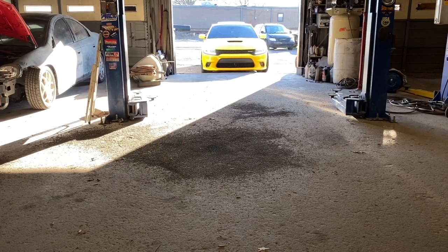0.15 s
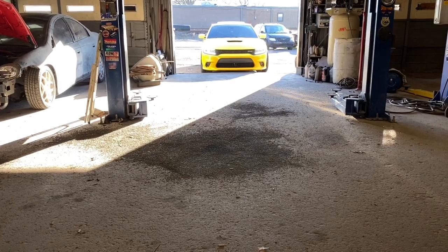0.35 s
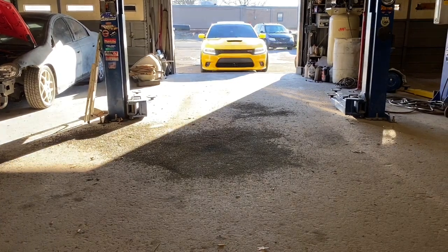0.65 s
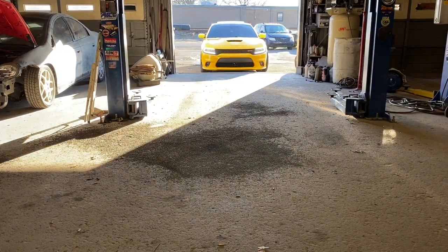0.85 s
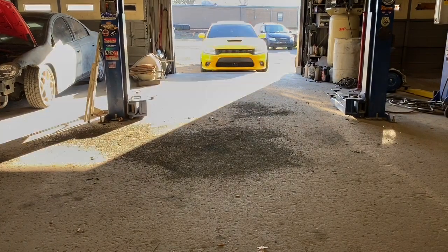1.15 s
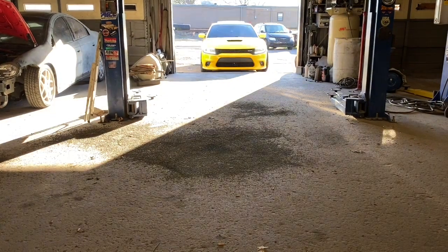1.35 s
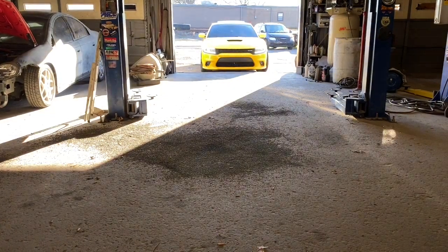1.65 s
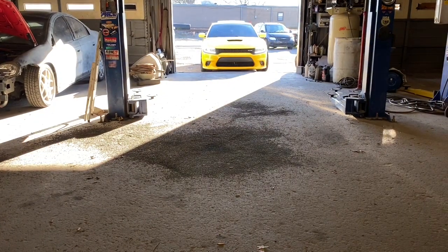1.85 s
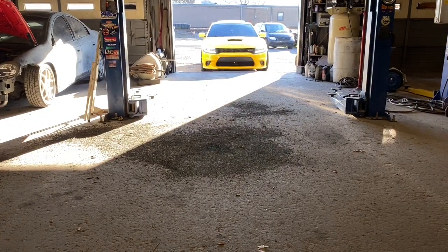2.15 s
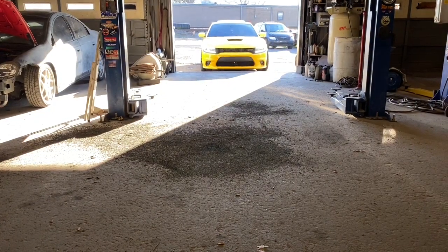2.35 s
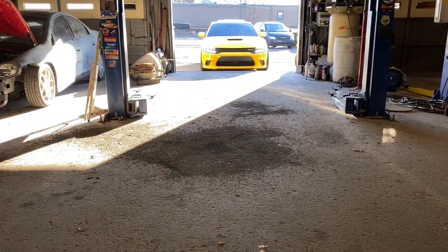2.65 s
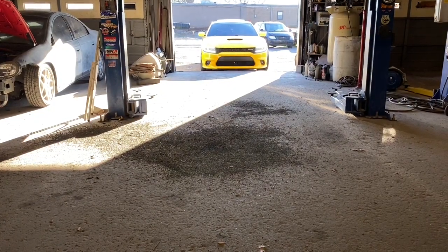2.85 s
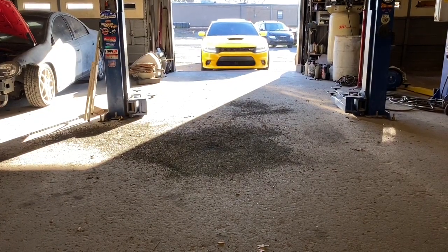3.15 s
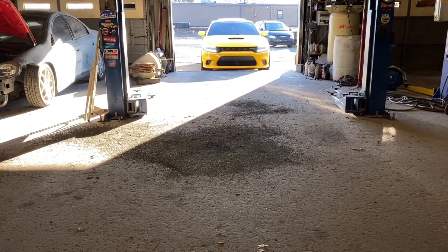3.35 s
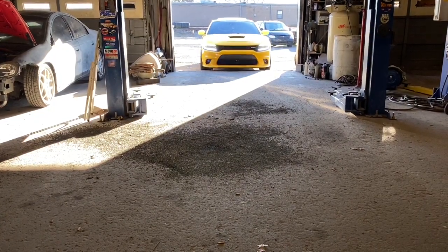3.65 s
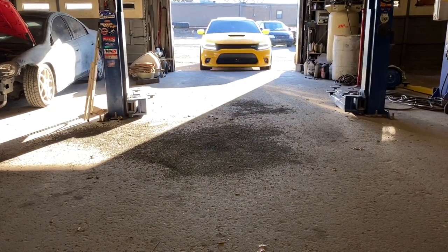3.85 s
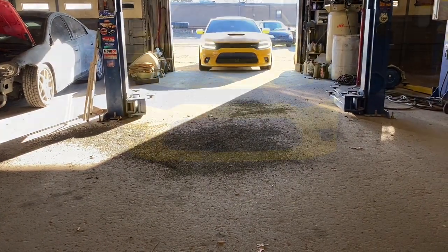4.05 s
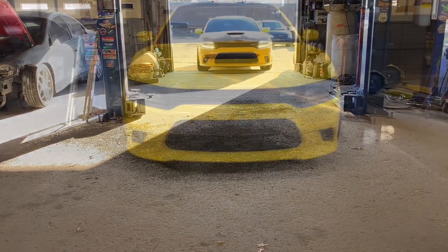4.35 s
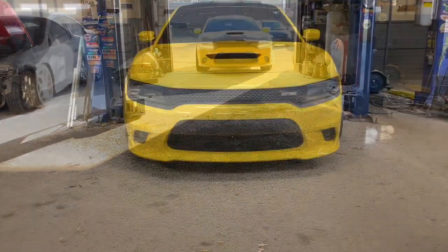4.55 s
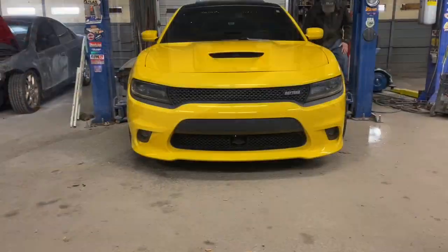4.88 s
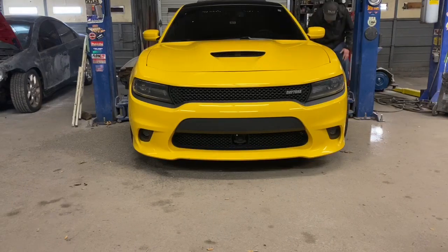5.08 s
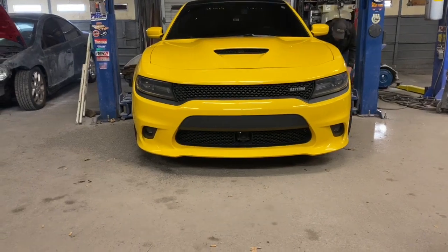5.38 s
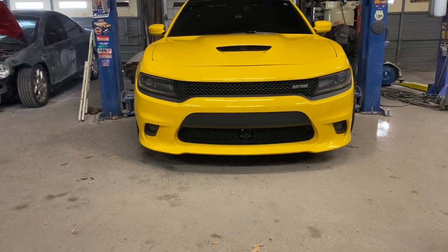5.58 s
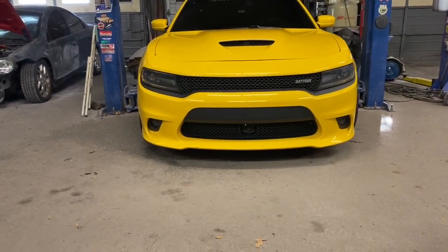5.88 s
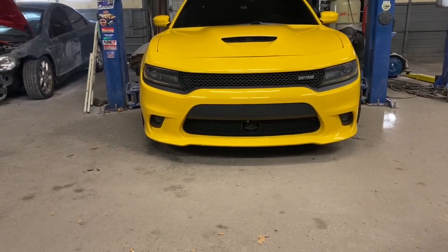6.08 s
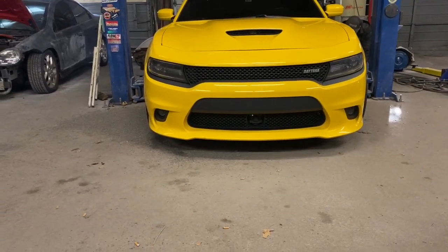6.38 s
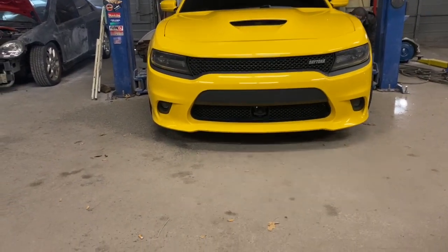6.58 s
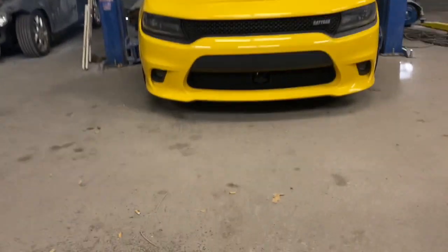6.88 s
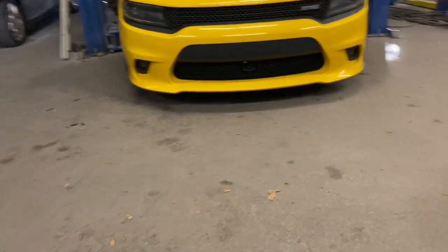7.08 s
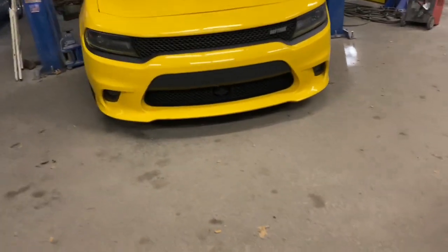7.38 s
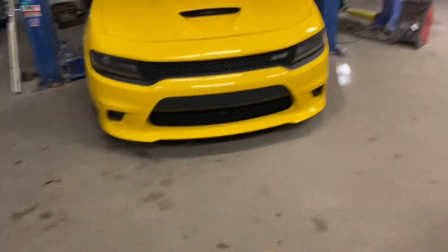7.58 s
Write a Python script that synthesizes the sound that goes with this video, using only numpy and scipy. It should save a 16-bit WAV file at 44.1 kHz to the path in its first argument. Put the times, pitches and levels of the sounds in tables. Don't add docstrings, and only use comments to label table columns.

```python
import sys
import numpy as np
from scipy import signal
from scipy.fft import rfft, irfft
from scipy.io import wavfile
from scipy.ndimage import uniform_filter1d

SR = 44100
rng = np.random.default_rng(int(sys.argv[2]) if len(sys.argv) > 2 else 0)


def file_out(sig):
    cols = np.atleast_2d(sig).T
    lim = np.clip(cols, -1, 1)
    pcm = np.round(lim * 32767).astype(np.int16)
    wavfile.write(sys.argv[1], SR, pcm)


def boost_factor(decibels):
    exponent = np.asarray(decibels, float) / 20
    return 10 ** exponent


N = 340893
T = np.arange(N) / SR
HZ = np.fft.rfftfreq(N, 1 / SR)

POPS_PER_S, POP_SPREAD_DB = 300, 1.5
INSIDE_S = 4.7
# freq_hz, right_lag_samples
PORT_LAG = [(300, 16), (1000, 15.8), (2000, 18), (3000, 19), (6000, 21.5)]


def evened(x):
    return x / np.sqrt(np.mean(x ** 2) + 1e-20)


def read(points, hz):
    f, value = np.transpose(points)
    return np.interp(np.log(hz + 1), np.log(f + 1), value)


def curves(tables):
    s, *columns = np.vstack(tables).T
    return [np.interp(T, s, column) for column in columns]


def after(s, span_s):
    return np.clip((T - s) / span_s + 0.5, 0, 1)


def colour(x, gain):
    return irfft(rfft(x) * gain, N)


def band(x, lo_hz, hi_hz):
    low_side = 1 + (lo_hz / (HZ + 1)) ** 16
    high_side = 1 + (HZ / hi_hz) ** 16
    return colour(x, 1 / np.sqrt(low_side * high_side))


def modes(table, sign):
    response = 0
    for k, (hz, width_hz, level_db) in enumerate(table):
        response = response + sign ** k * boost_factor(level_db) / (1 + 2j * (HZ - hz) / width_hz) ** 2
    return response


def wander(rate_hz):
    return evened(colour(rng.standard_normal(N), 1 / (1 + (HZ / rate_hz) ** 4)))


def pops(per_s, spread_db):
    size = boost_factor(spread_db * np.minimum(rng.exponential(1, N), 4))
    polarity = np.sign(rng.standard_normal(N))
    return size * polarity * (rng.random(N) < per_s / SR)


def presence():
    # start_s, level_db
    presence_track = [
        (0, -0.25),
        (1.1, 0.2),
        (2, -0.5),
        (3.95, 0),
        (4.2, -2.5),
        (4.58, -3.5),
        (4.7, -2.5),
        (5.05, 0),
        (7.73, 0.5),
    ]
    return curves([presence_track])[0]


def surges(lo_hz, hi_hz):
    # centre_s, swell_db, register_hz, length_s
    flame_surges = [(0.037, 8, 340, 0.027), (0.24, 8, 340, 0.055), (0.409, 6.5, 100, 0.097),
                    (0.671, 1.5, 340, 0.14), (0.988, 4.5, 190, 0.06), (2.211, 4.5, 340, 0.06),
                    (2.363, 5, 340, 0.04), (3.144, 6, 340, 0.025), (3.19, 6, 100, 0.06),
                    (3.608, 2.5, 100, 0.098), (3.8, 4.5, 100, 0.0606), (3.85, -7.5, 190, 0.064),
                    (4.056, 4, 100, 0.09), (4.17, 5, 340, 0.24), (4.18, -11, 100, 0.06),
                    (4.23, 5.5, 190, 0.035), (4.5, -6, 100, 0.14), (4.656, 7, 190, 0.074),
                    (4.674, 9, 100, 0.04), (4.908, -5.1, 100, 0.038), (5.002, -5, 340, 0.09),
                    (5.32, 8.5, 100, 0.083), (5.44, -11.5, 100, 0.04), (5.99, -4, 190, 0.13),
                    (6.22, 6.5, 100, 0.06), (6.299, 2.5, 340, 0.09), (6.496, -11.5, 190, 0.09),
                    (6.764, 4, 100, 0.06), (7.003, 5, 100, 0.09), (7.303, 3.5, 100, 0.14)]
    swell = np.zeros(N)
    for s, level_db, hz, length_s in flame_surges:
        if lo_hz < hz < hi_hz:
            swell += level_db * np.exp(-2 * ((T - s) / length_s) ** 2)
    return swell


def boom():
    # freq_hz, width_hz, level_db
    room_modes = [(64, 26, -5), (80, 22, -5), (106, 16, 1), (122, 18, -3), (144, 18, -7), (170, 26, 1),
                  (208, 22, -6), (232, 26, -3), (254, 16, -2), (281, 17, 1), (304, 24, 0), (330, 15, -6),
                  (358, 19, -1), (408, 22, -10), (455, 20, -14)]
    register_db = [-23.5, -23, -22]
    follows = [0.66, 0.96, 1.4]
    ragged_db, upper_lost_db, lifted_s = 1.63, -6, 7.1
    rung = colour(pops(POPS_PER_S, POP_SPREAD_DB), modes(room_modes, -0.965) + boost_factor(-28.0))
    out = np.zeros(N)
    for k, (lo_hz, hi_hz) in enumerate([(57, 140), (140, 260), (260, 480)]):
        level_db = register_db[k] + follows[k] * presence() + surges(lo_hz, hi_hz) + ragged_db * wander(22)
        if k == 2:
            level_db = level_db + upper_lost_db * after(lifted_s, 0.13)
        part = band(rung, lo_hz, hi_hz)
        power = uniform_filter1d(uniform_filter1d(part ** 2, size=3000), size=3000)
        drift = np.sqrt(abs(power) + 1e-12)
        out += boost_factor(level_db) * evened(part / drift)
    return out


def firing():
    # start_s, pitch_hz, level_db
    firing_track = [(0, 46.15, -32), (.5, 42.25, -33.5), (1.1, 45.63, -33.5), (2, 49.66, -50),
                    (2.4, 47.84, -25.5), (2.8, 47.8, -25), (2.95, 49.7, -41), (3.6, 56.3, -35),
                    (3.8, 56.2, -34), (4, 53.9, -31), (4.2, 50.9, -40), (4.4, 47.4, -31), (4.7, 42.9, -42),
                    (4.9, 41.5, -64)]
    hz, level_db = curves([firing_track])
    phase = 2 * np.pi * np.cumsum(hz) / SR
    return np.sqrt(2) * boost_factor(level_db + 1.5 * wander(4)) * np.sin(phase)


def whine():
    shaft_hz, inside_db = 57.268, -1.5
    orders_heard = [10, 24, 25, 27, 28, 29, 30, 31, 32, 33, 35, 36, 39, 41, 43, 47, 49, 50, 51, 52, 54, 57,
                    58, 59, 60, 62, 63, 64, 65]
    # left_db, right_db
    order_levels = [(-45.1, -49.6), (-58.6, -52.9), (-53.0, -46.9), (-51.1, -51.7), (-43.7, -44.0),
                    (-52.6, -46.6), (-55.0, -56.7), (-48.5, -48.7), (-61.0, -54.8), (-55.1, -47.7),
                    (-50.1, -48.5), (-56.6, -62.7), (-54.1, -54.2), (-60.0, -60.0), (-53.7, -52.9),
                    (-63.4, -58.5), (-60.4, -58.7), (-55.7, -53.6), (-62.8, -63.5), (-55.9, -57.0),
                    (-59.9, -58.5), (-61.4, -63.3), (-62.1, -61.0), (-60.1, -60.7), (-59.2, -59.9),
                    (-61.7, -61.3), (-68.0, -60.4), (-61.9, -57.7), (-66.7, -66.1)]
    turns = np.cumsum(shaft_hz * (1 + 0.0002 * wander(1.5))) / SR
    waver = [wander(4.1) for _ in range(4)]
    out = np.zeros((2, N))
    for k, (order, level_db) in enumerate(zip(orders_heard, order_levels)):
        hz = order * shaft_hz
        lag = 2 * np.pi * hz * read(PORT_LAG, hz) / SR * np.array([[0], [1]])
        tone = np.sin(2 * np.pi * (order * turns + rng.random()) - lag)
        out += np.sqrt(2) * boost_factor(level_db)[:, None] * boost_factor(1.2 * waver[k % 4]) * tone
    return out * boost_factor(1.3 * presence() + 1.5 + inside_db * after(INSIDE_S, 0.92))


def air():
    # freq_hz, density_db (per Hz)
    roar_spectrum = [(350, 7), (450, -0.3), (600, 0.2), (1000, -5.5), (1250, -4.5), (1400, -5), (2000, -22),
                     (3000, -17), (3500, -17), (5000, -17), (7000, -21.5)]
    # freq_hz, density_db (per Hz)
    hiss_spectrum = [(6000, -2.5), (7500, -3), (9000, -1), (11000, -4.5), (12500, -7), (13300, 0.5),
                     (13900, 0), (14600, 3.5), (15500, -4.5)]
    # freq_hz, width_hz, level_db over the roar
    housing_modes = [(555, 28, -9.5), (869.3, 9.7, 6), (1057, 66, 0.5), (1200, 54, -4.5), (1636, 140, 6),
                     (2114, 250, 18), (2560, 90, -19.5), (3250, 300, 8), (4200, 600, 1)]
    layer_db = [-31.5, -45, -55.7]
    follows = [.9, 0.81, .9]
    split_hz, inside_edge_db = 3300, 1.5
    roar_db, edge_db, hiss_db = (db + share * presence() for db, share in zip(layer_db, follows))
    rough = rng.standard_normal(N) + 0.32 * evened(pops(1500, 7.5))
    roar = colour(rough, boost_factor(read(roar_spectrum, HZ)) * (1 + abs(modes(housing_modes, -0.81))))
    hiss = band(colour(rng.standard_normal(N), boost_factor(read(hiss_spectrum, HZ))), 7050, 17400)
    out = boost_factor(roar_db + 5 + 0.62 * wander(30)) * evened(band(roar, 331, split_hz))
    out += boost_factor(edge_db + 1.0 + inside_edge_db * after(INSIDE_S, 0.6)) * evened(band(roar, split_hz, 8200))
    out += boost_factor(hiss_db + 12.5) * evened(hiss)
    return out * boost_factor(0.6 * wander(8.9))


def bay():
    rung = colour(pops(POPS_PER_S, POP_SPREAD_DB), modes([(444, 70, 0)], 1))
    return boost_factor(-37) * after(INSIDE_S, 0.37) * evened(rung)


def scrape(row, body, grain):
    start_s, peak_db, attack_s, hold_s, release_db_per_s = row
    grit_db, top_hz = grain
    rise_db, sag_db = 18, 5.5
    age = T - start_s
    level_db = np.interp(age, [0, attack_s, attack_s + hold_s], [-rise_db, 0, -sag_db])
    fall_db = release_db_per_s * np.maximum(age - attack_s - hold_s, 0)
    stroke = boost_factor(peak_db + level_db - fall_db) * np.clip(age / 0.015, 0, 1)
    high_pass = HZ / 700 / (1 + (HZ / 700) ** 2) ** 0.5
    grit = boost_factor(grit_db) * high_pass / (1 + (HZ / top_hz) ** 4)
    response = abs(modes(body, 0.82)) + grit
    near, far = (stroke * evened(colour(pops(3500, 5.2), response)) for _ in range(2))
    return ports(near, far, 1, 0.44)


def scrapes():
    # start_s, peak_db, attack_s, hold_s, release_db_per_s
    strokes = [
        (6.933, -21, 0.07, .06, 153),
        (7.398, -25.5, .032, 0.056, 128.5),
    ]
    # freq_hz, width_hz, level_db
    stand_modes = [
        [(1620, 220, -7.5), (2400, 220, 0), (3650, 110, -11), (3930, 130, -9), (5170, 220, -10),
         (6780, 300, -17)],
        [(1400, 400, -6), (1850, 200, 0), (2050, 200, -1), (2550, 300, -8), (3300, 600, -9)],
    ]
    # broad grit_db, top_hz
    grains = [(-19.5, 5200), (-21, 3000)]
    return sum(scrape(*row) for row in zip(strokes, stand_modes, grains))


def knocks():
    # start_s, peak_db, pitch_hz, t60_s
    catches = [
        (6.954, -23.5, 3960, 0.021),
        (6.995, -15, 1610, 0.024),
        (7.232, -27, 900, .012),
        (7.409, -16, 3200, 0.005),
        (7.433, -27, 1840, .02),
    ]
    out = np.zeros(N)
    for s, peak_db, hz, t60_s in catches:
        age = np.maximum(T - s, 0)
        ring = boost_factor(peak_db - 60 * np.minimum(age / t60_s, 4)) * np.sin(2 * np.pi * hz * age)
        out += ring * (age < 3 * t60_s)
    return out


def lift():
    start_s, top_s, peak_db, rise_db, fall_db_per_s = 7.2, 7.5, -24.5, 12, 49.5
    rush = colour(rng.standard_normal(N), modes([(423, 36, 0), (574, 120, 0), (710, 430, -1)], -0.81))
    level_db = np.interp(T, [start_s, top_s], [-rise_db, 0]) - fall_db_per_s * np.maximum(T - top_s, 0)
    return boost_factor(peak_db + level_db) * evened(rush) * after(start_s, 0.046)


def ground():
    return boost_factor(-52.0) * evened(band(rng.standard_normal(N), 22, 38))


def walls(t60_s, level_db):
    tail = rng.standard_normal(N) * boost_factor(-60 * np.minimum(T / t60_s, 4))
    return 1 + boost_factor(level_db) * rfft(tail / np.linalg.norm(tail))


def ports(x, other, lag, same):
    # freq_hz, left_minus_right_db
    balance = [(50, .8), (110, .5), (200, 3), (300, 1.8), (390, 2), (440, -4), (520, 7.5), (600, 2.5),
               (800, 4.2), (1000, 2), (1200, -1.8), (1500, -.5), (2200, -1), (3500, 0)]
    # freq_hz, right_lead_samples
    treble_lead = [(8500, 10.38), (12050, 10.98)]
    late = np.exp(-2j * np.pi * HZ * lag / SR)
    early = -np.exp(2j * np.pi * HZ * read(treble_lead, HZ) / SR)
    turn = np.where(HZ < 7000, late, early)
    lean = boost_factor(-read(balance, HZ))
    right = colour(x, same * turn * lean) + colour(other, np.sqrt(1 - same ** 2) * lean)
    return np.array([x, right])


def scene():
    # freq_hz, coherence (0 to 1)
    coherence = [(50, 1), (120, .98), (250, .9), (380, .55), (550, .35), (700, .75), (1100, .85),
                 (2000, .65), (3000, .65), (5000, .4), (7000, .3), (8500, .72), (11500, .92), (16000, .95)]
    ripple = walls(0.12, -10)
    near, far = (boom() + colour(air(), ripple) + lift() + bay() for _ in range(2))
    steady = ports(near, far, read(PORT_LAG, HZ), read(coherence, HZ))
    return steady + ground() + firing() + whine() + knocks() + scrapes()


def top_cut(x):
    return signal.sosfilt(signal.butter(12, 16180, fs=SR, output="sos"), x)


def record(dry):
    # start_s, end_s
    mute = (1.1045, 1.9695)
    heard = np.where(T < mute[0], 1, np.clip((T - mute[1]) / 0.008, 0, 1))
    low_pass = signal.firwin(401, 15720, window=("kaiser", 9), fs=SR)
    mix = signal.oaconvolve(dry * heard, low_pass[None], "same")
    return top_cut(mix)


dry = scene()
out = record(dry)
file_out(out)
```